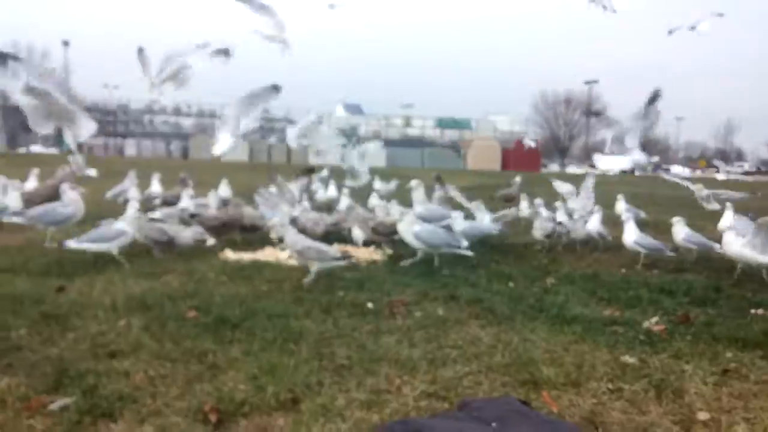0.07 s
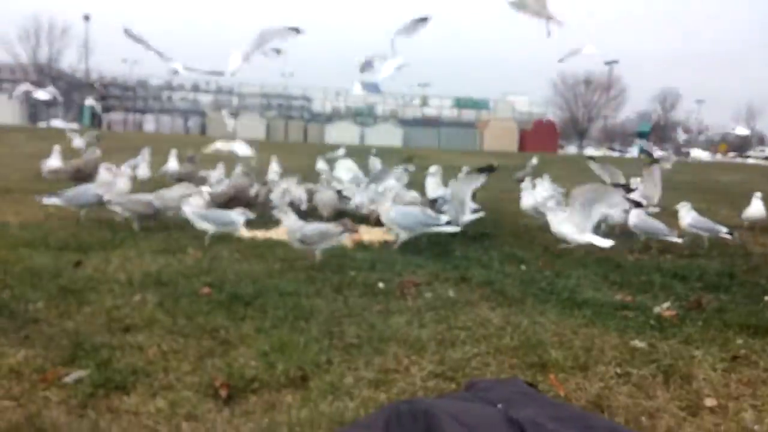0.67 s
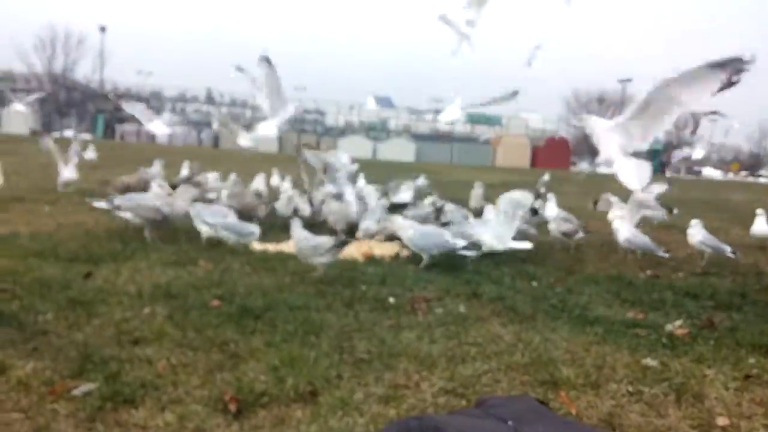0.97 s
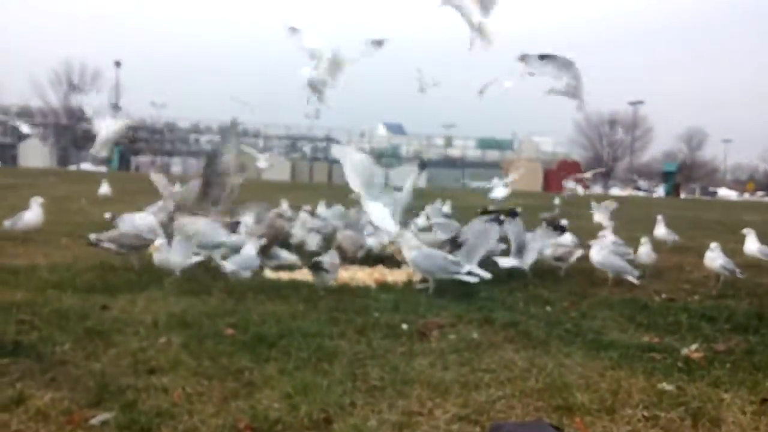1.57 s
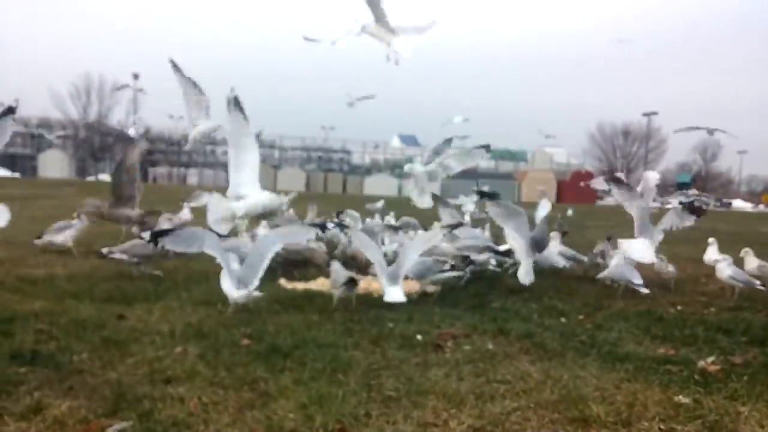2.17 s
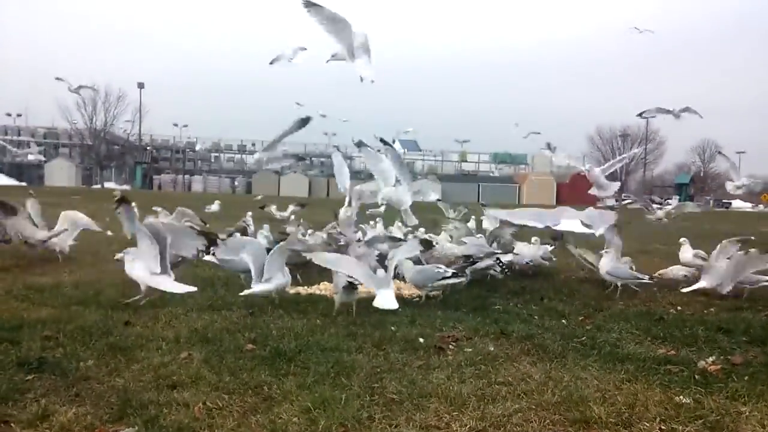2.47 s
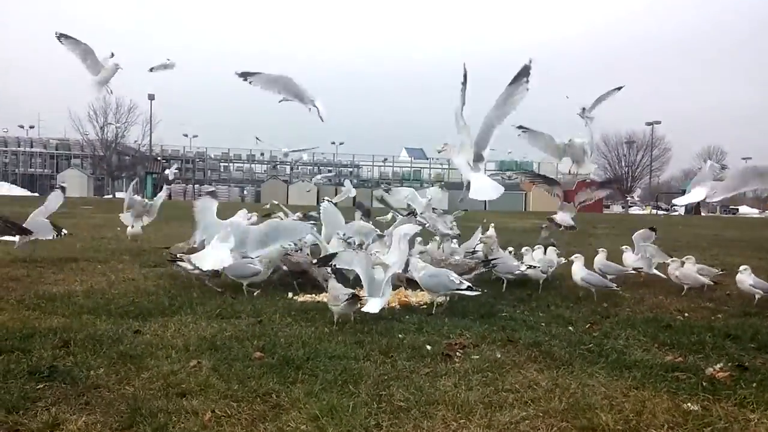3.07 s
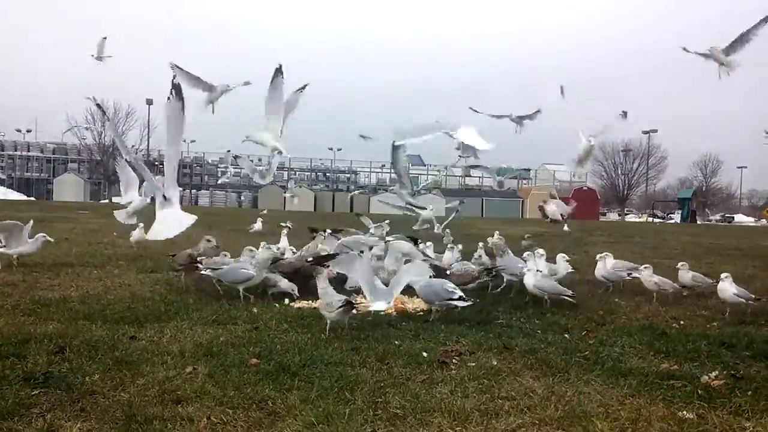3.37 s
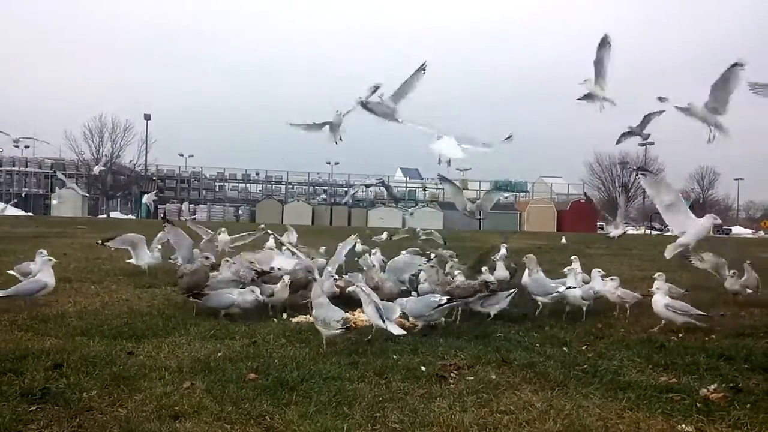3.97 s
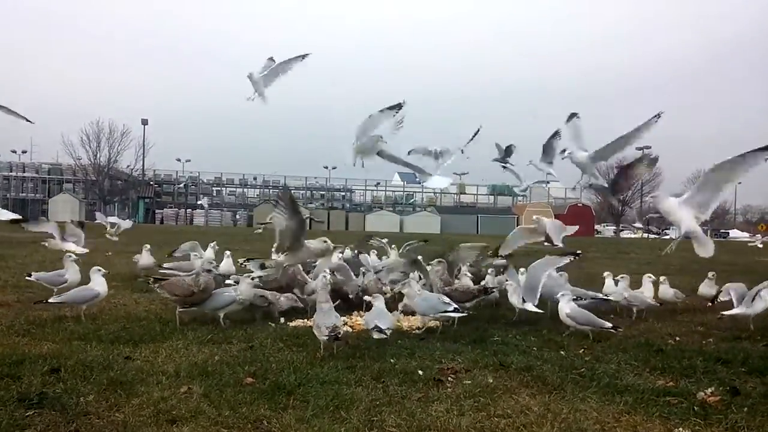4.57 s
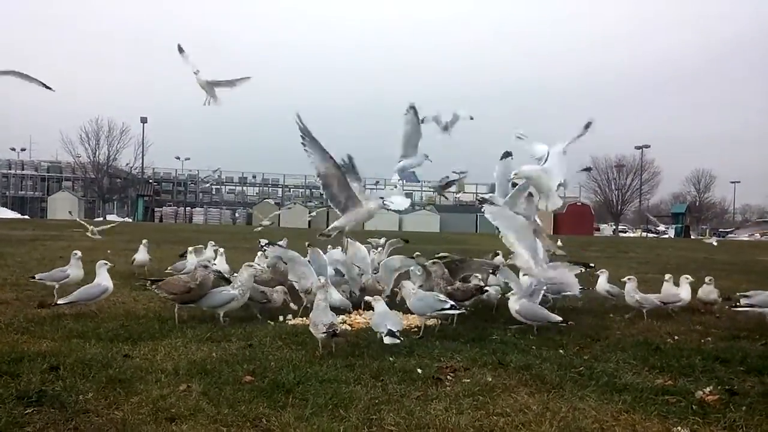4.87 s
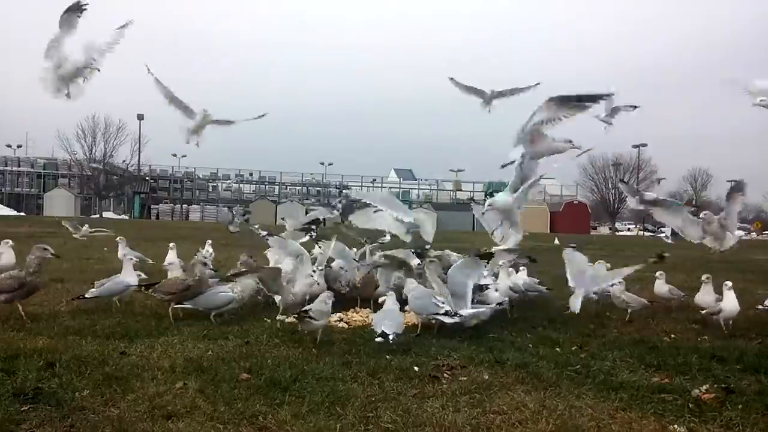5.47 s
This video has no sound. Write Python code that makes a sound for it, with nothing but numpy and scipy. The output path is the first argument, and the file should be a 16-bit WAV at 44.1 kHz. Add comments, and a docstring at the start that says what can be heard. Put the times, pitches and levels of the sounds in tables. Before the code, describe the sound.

A flock of gulls squeals and squawks over food on an open lawn, with fluttering wings and gusts rumbling on the microphone.

```python
"""Gulls squabble over food on an open lawn, a few metres from a hand-held phone.
After 0.6 s of silence the sound opens abruptly on fluttering wings. Young birds squeal in near-pure
whistles; from 1.1 s adults squawk in rough pulsed voices, shaped by the resonances of the throat.
From 2.3 s wings and bills clap now and then, as the flock behind grows loudest. Near 4 s the calls
thin out and gusts buffet the microphone ports; the squabble flares again as the wind dies away."""
import sys
import numpy as np
from scipy import signal
from scipy.fft import rfft, irfft, next_fast_len
from scipy.io import wavfile
from scipy.ndimage import map_coordinates

SR = 44100
rng = np.random.default_rng(int(sys.argv[2]) if len(sys.argv) > 2 else 0)


def wav_record(signal):
    """Record a signal, one row per channel, as 16-bit PCM in the file named by sys.argv[1]."""
    frames = np.transpose(np.atleast_2d(signal))
    bounded = np.clip(frames, -1, 1)
    # unit amplitude maps onto the largest positive 16-bit level
    quanta = np.round(bounded * 32767).astype(np.int16)
    wavfile.write(sys.argv[1], SR, quanta)


N = 252693
TIME = np.arange(N) / SR


def near_gulls(squeal_arch=3.2, squawk_arch=52, squeal_peak=0.27, squawk_peak=0.45, peak_shift=0.034):
    """Pitch follows effort: long or forced calls arch more; rising ones peak later, falling ones sooner."""
    # whistles of the young: (start [s], end [s], pitch [Hz], glide [semitones], level [dB],
    # overtone [dB], lead at the left port [ms])
    squeals = [(0.745, 0.799, 3390, 1.6, -34.5, -4.5, -0.47), (0.806, 1.005, 4630, -0.7, -26.5, -25, -.13),
               (0.793, 1.061, 4004, -0.9, -36.5, -51.5, -.13), (1.13, 1.325, 4790, 1, -40, -37, -0.046),
               (1.208, 1.315, 1147, -2, -42, 2.5, 0.017), (1.587, 1.739, 2368, 1.75, -21.5, -6.5, -0.52),
               (1.815, 1.857, 1845, -1.5, -32.5, -6, -0.067), (1.953, 2.011, 2955, -3, -25, -16.5, -0.11),
               (1.983, 2.052, 1651, -2, -25, 6, -0.065), (2.015, 2.142, 1784, 0.6, -23.5, -11.5, -0.049),
               (2.148, 2.194, 2284, 1.4, -34, -15, 0.065), (2.176, 2.245, 3410, -0.1, -22, -20.5, -0.48),
               (2.225, 2.327, 3604, 0.4, -20.5, -15.5, -0.53), (2.311, 2.494, 4550, -0.5, -22, -21, -0.5),
               (2.362, 2.486, 1806, 1.3, -28, -8, -0.054), (2.492, 2.556, 3300, -1, -19, -20, -.48),
               (2.545, 2.644, 2787, -1.4, -20.5, -18, -0.513), (2.661, 2.744, 2716, 1.3, -19, -37, -0.51),
               (2.699, 2.822, 4490, -1.5, -29, -35.5, -.46), (2.802, 2.95, 2940, -1, -35.5, -5.5, -.53),
               (2.816, 2.89, 1940, -0.4, -25, -15, -0.028), (2.971, 3.005, 2110, -3, -30, -2, 0.021),
               (3.559, 3.671, 4215, 0, -18, -12, -0.54), (3.673, 3.83, 4570, -0.5, -31.5, -19, -0.49),
               (3.655, 3.854, 4250, -0.7, -28, -19, -0.56), (3.825, 3.875, 3904, -2.5, -22.5, -17.5, -0.57),
               (4.686, 4.8, 1751, -0.4, -32, -11.5, 0), (4.842, 5.087, 6550, -2.5, -53.5, -26, .03),
               (4.927, 4.98, 1857, -5, -32.5, -19, -0.061), (4.949, 5.031, 2420, 1.7, -33.5, -20, -0.059),
               (5.038, 5.176, 3650, 0.4, -42, -20, 0.058), (5.177, 5.26, 2320, -1.9, -36, -25, 0.028),
               (5.217, 5.247, 3670, 2.5, -23, -11, 0.057), (5.273, 5.313, 2410, -2.5, -29, -25, .02),
               (5.379, 5.464, 2280, 5.5, -28.5, -14, 0.071)]
    # pulsed calls of adults: (start [s], end [s], pitch [Hz], glide [semitones], level [dB],
    # throat resonance [Hz], treble [dB], rasp [0-1], lead at the left port [ms])
    squawks = [(1.095, 1.213, 442, 1, -28, 2340, -21, 0.8, 0),
               (1.347, 1.474, 464, -0.4, -22, 2538, -27, 0.8, -0.042),
               (1.467, 1.538, 414, 1.5, -31, 2170, -12.5, 0.76, 0.1),
               (1.606, 1.679, 337, -0.5, -32.5, 2400, -5.5, 0.9, -0.5),
               (1.702, 1.804, 612.5, 0, -23.5, 2783, -14, .55, -.16),
               (1.751, 1.865, 457.6, 2, -28.5, 2590, -18.5, 0.9, -0.048),
               (1.994, 2.085, 468, 0.5, -23.5, 2650, -11.5, 0.89, -0.067),
               (2.015, 2.152, 598, 1, -26.5, 2380, -12, 0.6, -0.097),
               (2.085, 2.179, 447, -1, -24.5, 2720, -14, .8, 0.47),
               (2.348, 2.499, 609.4, 1, -22.5, 2350, -7.5, 0.5, -0.062),
               (2.469, 2.574, 441, -3.5, -19.5, 2480, -16.5, .75, -0.48),
               (2.54, 2.657, 559, 1.5, -25.5, 2740, -8, .45, -0.47),
               (2.643, 2.691, 422, 1.5, -24.5, 2980, -15, 0.6, 0.091),
               (2.724, 2.82, 421.4, 3.5, -22.5, 2293, -23.5, .5, 0.41),
               (2.813, 2.889, 379.3, -3.5, -23.5, 2360, -17.5, 0.66, -0.085),
               (2.878, 2.935, 329, 2, -25, 2460, -22, 0.8, 0.11),
               (2.936, 3.011, 388.7, -3.5, -25.5, 2430, -19, .8, 0.1),
               (3.028, 3.115, 382, -2.2, -31, 2270, -28, 0.89, 0.083),
               (3.162, 3.242, 401.5, 10, -22.5, 3000, -12, 0.5, -0.062),
               (3.222, 3.309, 930.4, -1.66, -19.5, 3200, -4.5, 0.41, 0.32),
               (3.303, 3.361, 383, -4.5, -26, 3650, -14.5, 0.5, -0.31),
               (3.425, 3.514, 347.4, -3, -30.5, 3400, -16, 0.7, -0.25),
               (3.462, 3.525, 370, 1.5, -39, 4450, -7, 0.5, -.235),
               (3.513, 3.607, 950, -2, -29, 2100, -10, .6, 0.543),
               (3.672, 3.777, 466.5, 0.9, -31, 3660, -8, 0.6, 0.086),
               (4.302, 4.416, 341.6, 2.5, -39, 2217, -22, 0.8, 0),
               (4.633, 4.71, 322, 3.5, -34, 2080, -34, 0.67, 0),
               (4.687, 4.802, 582.7, -1.5, -25, 2052, -22, .65, 0),
               (5.232, 5.311, 571, 0.5, -28, 4600, -5, 0.8, 0.074),
               (5.296, 5.408, 617.5, -1, -23.5, 3480, -1, 0.3, 0.57),
               (5.395, 5.479, 416, -1, -25, 4350, -8.5, 0.8, .089),
               (5.408, 5.46, 605, -2, -27, 3570, -16, .4, 0.085),
               (5.458, 5.522, 605, 0, -27, 3650, -15, 0.6, 0.063),
               (5.461, 5.552, 471, -1.5, -23.5, 2290, -5, 0.8, 0.48),
               (5.516, 5.576, 598, 0.5, -25, 3630, -6.5, .4, -0.048),
               (5.565, 5.646, 590, -1.5, -25.5, 3680, -5, 0.4, -0.061),
               (5.647, 5.722, 903, -1.5, -30, 2050, -12.5, 0.9, -0.035)]
    out = np.zeros((2, N))
    for start, end, pitch_hz, glide, db, overtone_db, lead_ms in squeals:
        length = end - start
        pitches = contour(pitch_hz, glide, squeal_arch * length)
        call = squeal(length, pitches, squeal_peak + peak_shift * glide, overtone_db)
        add(out, start, undb(db) * call, lead_ms=lead_ms)
    for start, end, pitch_hz, glide, db, throat_hz, treble_db, rasp, lead_ms in squawks:
        length = end - start
        pitches = contour(pitch_hz, glide, squawk_arch * length * rasp ** 2)
        call = squawk(length, pitches, squawk_peak + peak_shift * glide, throat_hz, treble_db, rasp)
        add(out, start, undb(db) * call, lead_ms=lead_ms)
    return out


def squeal(length, pitches, peak, overtone_db, waver=0.0037, shimmer=0.18, third_db=-17,
           hiss_db=-25, buzz_db=-15, buzz_hz=440, flutter_db=2):
    """Self-sustained oscillation: a tight syrinx whistles; its other side adds a modulating buzz."""
    hz, swell = gesture(length, pitches, peak, edge_s=0.0058, taper=1.0)
    n = len(hz)
    hz = hz * (1 + waver * walk(n, 32.8) + 0.009 * walk(n, 244))
    swell = swell * undb(flutter_db * walk(n, 26.7))
    phase = 2 * np.pi * np.cumsum(hz) / SR
    partials_db = [0, overtone_db, overtone_db + third_db]
    tone = sum(undb(db) * np.sin(k * phase) for k, db in enumerate(partials_db, 1))
    buzz_phase = 2 * np.pi * np.cumsum(buzz_hz * (1 + 0.15 * walk(n, 44))) / SR
    buzz = undb(buzz_db) * np.sin(buzz_phase)
    hiss = undb(hiss_db) * walk(n, 460) * np.cos(phase)  # narrow noise band around the pitch
    return np.sqrt(2) * swell * (tone * (1 + shimmer * walk(n, 81.3) + buzz) + hiss)


def squawk(length, pitches, peak, throat_hz, treble_db, rasp, shimmer=0.57, doubling=0.39,
           lock_db=3, sag=0.0562, follow=0.49):
    """Source and filter: the syrinx slaps once a cycle, unevenly if forced, and the throat rings."""
    hz, swell = gesture(length, pitches, peak, edge_s=0.014, taper=2.27)
    hz = hz * (1 - sag * np.exp(-3 * swell))  # the pitch sags where the air pressure is low
    n, rough = len(hz), np.clip(rasp, 0, 1) ** 2
    jitter = .009 * rough * walk(n, 110) + .006 * walk(n, 30)
    phase = 2 * np.pi * np.cumsum(hz * (1 + jitter)) / SR
    pulses = unit(sum(np.cos(k * phase) for k in range(1, int(12000 / hz.max()) + 1)))
    # period doubling: slaps alternate strong and weak, each with a puff of noise
    pulses = pulses * (1 + rough * (shimmer * walk(n, 145.7) + doubling * np.cos(phase / 2)))
    puffs = .35 * rough * unit((1 + np.cos(phase)) * rng.standard_normal(n))
    # the throat's clock speeds up with the pitch, so its resonances glide with the call
    clock = np.cumsum((hz / hz[n // 2]) ** follow)
    ticks = np.interp(np.arange(int(clock[-1]) + 2), clock, np.arange(n))
    source = map_coordinates(pulses + puffs, [ticks])
    voice = map_coordinates(throat(windpipe(source), throat_hz, treble_db), [clock])
    # the bill opens with the push of air, so the call is brightest in its swell
    closed = shape(voice, lambda f: 1 / (1 + (f / throat_hz) ** 6))
    voice = closed + (swell / swell.max()) ** 2 * (voice - closed)
    # the harmonic nearest the throat resonance locks on and sings out, most in a clear voice
    harmonic = np.round(throat_hz / pitches[1])
    locked = np.sqrt(2) * np.sin(harmonic * phase) * (1 + rough * walk(n, 116))
    return swell * unit(voice + undb(lock_db) * max(1 - rasp, 0) * locked)


def throat(source, throat_hz, treble_db, width=0.33, widen=0.005, pipe_hz=1780, pipe_db=-16,
           skirt_db=-30, bill_hz=5300, bill_width=0.18, top_db=-9):
    """Formants: the throat resonates above the windpipe; an open bill widens the peak and adds treble."""
    width = max(width + widen * treble_db, .1)

    def formants(f):
        peaks = bell(f, throat_hz, width) + undb(pipe_db) * bell(f, pipe_hz, 0.046)
        return peaks / (1 + (1500 / f) ** 16) + undb(skirt_db) * bell(f, 824, 0.14)
    body = shape(source, formants)
    top_gain = undb(top_db + treble_db / 2)
    treble = shape(source, lambda f: bell(f, bill_hz, bill_width) + top_gain * bell(f, 8220, 0.15))
    return unit(unit(body) + undb(treble_db + 0.5) * unit(treble))


def windpipe(source):
    """All-pass dispersion: echoes in the windpipe smear each slap over the cycle that follows."""
    round_trips_s = rng.uniform([[.0003], [.0007]], [[.0006], [.0012]])

    def echoes(f):
        delays = np.exp(-2j * np.pi * f * round_trips_s)
        return np.prod((.5 + delays) / (1 + .5 * delays), axis=0)
    return shape(source, echoes)


def contour(pitch_hz, glide, arch):
    """Intonation: start, middle and end pitch of a glide with drooping ends (glide, arch in semitones)."""
    return pitch_hz * 2 ** (np.array([-glide / 2 - arch, 0, glide / 2 - arch]) / 12)


def gesture(length, pitches, peak, edge_s, taper):
    """Breath pressure: one push bends the pitch and swells the level to a peak at 0-1 of the length."""
    progress = np.linspace(0, 1, int(max(length, .02) * SR))
    hz = np.polyval(np.polyfit([0, .5, 1], pitches, 2), progress)
    from_edge_s = np.minimum(progress, 1 - progress) * length
    edges = np.sin(np.pi / 2 * np.clip(from_edge_s / edge_s, 0, 1))
    return hz, unit(edges * np.exp(-taper * (progress - peak) ** 2))


def claps(dull_hz=7000):
    """Impact excitation: a wing or bill strikes, giving a broad band of noise that decays at once."""
    # strikes: (time [s], peak level [dB], band centre [Hz], time to decay by 60 dB [s])
    strikes = [(2.255, -31, 265, 0.18), (2.415, -29, 220, 0.052), (2.545, -13.5, 1770, 0.022),
               (2.945, -33, 8000, 0.009), (3.419, -30, 890, 0.46), (3.627, -25, 690, 0.019),
               (4.036, -34, 580, 0.096), (4.244, -35, 700, 0.067), (4.335, -23.5, 1670, 0.091),
               (4.467, -35.5, 2480, 0.069), (4.934, -29, 2580, 0.036), (5.418, -27, 1010, 0.033)]
    out, t = np.zeros((2, N)), TIME[:SR // 10]
    for start, db, centre_hz, t60 in strikes:
        def band(f):
            return 1 / (1 + 1j * (f / centre_hz - centre_hz / f)) / (1 + 1j * f / dull_hz) ** 2
        burst = rng.standard_normal(len(t)) * undb(-60 * t / t60)
        crack = shape(burst, band)
        add(out, start, undb(db) * crack / np.abs(crack).max())
    return out


def far_gulls(count=44):
    """Superposition: short bending squawks from the rest of the flock add up to a crowd."""
    # loudness of the distant flock: (time [s], level [dB])
    crowd_levels = [(.6, -40.5), (1.2, -47.5), (1.55, -34.5), (1.9, -44), (2.6, -27.5), (3.4, -39),
                    (4.1, -65), (4.6, -52), (5.7, -34)]
    out = np.zeros((2, N))
    for k, (when, length, pitch, throat_size, side, bend) in enumerate(rng.random((count, 6))):
        pitches = (300 + 480 * pitch ** 2) * np.array([.7 + .2 * bend, 1, .76])
        throat_hz = 1800 + 1100 * throat_size
        call = squawk(.11 + .14 * length, pitches, .5, throat_hz, treble_db=-11, rasp=.55)
        start = (k + when / 2) / count * N / SR
        add(out, start, call, pan_db=8 * (side - .5), lead_ms=0.59 * (side - .5))
    return unit(out) * undb(curves(crowd_levels)[0])


def wings(count=130, scatter_db=4, murmur=0.48, apart=0.32):
    """Aerodynamic noise: wingbeats, each a whoosh of feathers and a thud of air, merge into a flutter."""
    # loudness of the flutter: (time [s], level [dB])
    flutter_levels = [(.6, -33), (1.5, -34), (1.85, -43), (2.2, -41.5), (3.65, -39), (4.2, -44),
                      (5.73, -38)]
    # its spectrum: (frequency [Hz], gain [dB])
    flutter_spectrum = [(25, -45), (50, 2.5), (90, 5.5), (220, 0), (450, -7.5), (750, -13), (1400, -17),
                        (2500, -19.5), (5000, -30.5), (9000, -30), (15000, -42)]
    beats = np.zeros((2, N))
    for k, (when, length, size, side) in enumerate(rng.random((count, 4))):
        n = int((0.048 + 0.13 * length) * SR)
        whoosh = np.hanning(n) ** 2 * rng.standard_normal(n) * undb(2 * walk(n, 79.5))
        start = (k + when) / count * N / SR
        add(beats, start, whoosh * undb(scatter_db * size), 6 * (side - .5), 0.53 * (side - .5))
    blur = murmur * rng.standard_normal(N) + apart * rng.standard_normal((2, N))
    return unit(colour(unit(beats) + blur, flutter_spectrum)) * undb(curves(flutter_levels)[0])


def wind(flicker_db=2, eddy_half_s=0.03, eddy_pan_db=-13.5):
    """Turbulence: each port rumbles with its own noise; a windy spell and short eddies add in power."""
    # wind crossing from the left port to the right: (time [s], level [dB], left minus right [dB])
    spell = [(3.5, -66, -11), (3.9, -33.5, 18.5), (4.15, -33, -2), (4.35, -28.5, 5), (4.6, -31.5, -3),
             (4.8, -27.5, -14), (5.3, -33.5, -2), (5.55, -48, -11)]
    # eddies that slap the ports: (time [s], level [dB])
    eddies = [(4.009, -22), (4.464, -20.5), (4.55, -29), (4.855, -22.5), (4.981, -24.5), (5.082, -32.5)]
    # spectrum of the rumble: (frequency [Hz], gain [dB])
    rumble_spectrum = [(20, -32.5), (35, -36), (60, -1), (110, 1), (270, -12.5), (500, -27.5),
                       (1200, -57.5), (3000, -71)]
    sides = np.array([[.5], [-.5]])
    level_db, pan_db = curves(spell)
    power = undb(level_db + sides * pan_db) ** 2
    for centre_s, db in eddies:
        swell = np.exp(-.5 * ((TIME - centre_s) / eddy_half_s) ** 2)
        power = power + (undb(db + sides * eddy_pan_db) * swell) ** 2
    ports = np.array([rng.standard_normal(N) * undb(flicker_db * walk(N, 26)) for _ in range(2)])
    return unit(colour(ports, rumble_spectrum)) * np.sqrt(power)


def field(x, echo_db=-21, t60=0.19, dull_hz=4500):
    """Scattering: ground, sheds and trees return a thin, dull tail."""
    t = TIME[:SR // 2]
    tail = rng.standard_normal((2, len(t))) * undb(-60 * t / t60)
    tail = shape(tail, lambda f: 1 / (1 + 1j * f / dull_hz))
    tail = tail / np.sqrt(np.sum(tail ** 2, axis=1, keepdims=True))
    return x + undb(echo_db) * signal.fftconvolve(x, tail, axes=1)[:, :N]


def phone_body(x):
    """Acoustic shadow: the case shades each port differently, so a call leans aside with its pitch."""
    # imbalance of the ports: (frequency [Hz], left minus right [dB])
    imbalance = [(1200, -2.5), (1800, -4), (2400, -5.5), (3000, -3.5), (3600, 8.5), (4200, 7.5),
                 (4900, 6.5), (6200, 6), (7300, -3), (8700, -10.5), (11000, -1)]
    # colour that the case gives both ports: (frequency [Hz], gain [dB])
    case_response = [(1000, 2), (1700, -1), (2600, 1), (4200, 1.5), (6500, -1.5), (8500, 3), (10500, -2.5),
                     (12600, -7), (14200, 2.5)]
    hz, lean_db = np.transpose(imbalance)
    shares = [2 / (1 + undb(-side * lean_db) ** 2) for side in (1, -1)]
    ports = np.array([colour(port, np.c_[hz, 10 * np.log10(share)]) for port, share in zip(x, shares)])
    return colour(ports, case_response)


def add(out, start, sound, pan_db=0, lead_ms=0):
    """Level and time differences place a sound: positive values make the left port louder and earlier."""
    i = int(start * SR)
    for channel, side in enumerate((.5, -.5)):
        shifted = shape(sound, lambda f: np.exp(2j * np.pi * f * side * lead_ms / 1000))
        out[channel, i:i + len(shifted)] += undb(side * pan_db) * shifted[:max(N - i, 0)]


def shape(x, gain):
    """Linear filtering: multiply the spectrum by gain(frequency)."""
    size = next_fast_len(x.shape[-1] + 1024)
    hz = np.arange(size // 2 + 1) * SR / size + 1e-3
    return irfft(rfft(x, size) * gain(hz), size)[..., :x.shape[-1]]


def colour(x, points):
    """Equalisation through points of (frequency [Hz], gain [dB])."""
    hz, db = np.transpose(points)
    return shape(x, lambda f: undb(np.interp(np.log(f), np.log(hz), db)))


def bell(f, hz, width):
    """Resonance: a Gaussian hump on a log-frequency axis."""
    return np.exp(-.5 * (np.log(f / hz) / width) ** 2)


def walk(size, rate):
    """Band-limited noise of spread near 1 that changes about rate times a second."""
    knots = rng.standard_normal(int(2 * rate * size / SR) + 4)
    return map_coordinates(knots, [1 + np.arange(size) * 2 * rate / SR], order=3, mode="nearest")


def curves(rows):
    """Linear interpolation of a table's columns over time."""
    times, *columns = np.transpose(rows)
    return [np.interp(TIME, times, column) for column in columns]


def undb(db):
    """Decibels to amplitude ratio."""
    return 10 ** (np.asarray(db) / 20)


def unit(x):
    """Normalisation to rms 1."""
    return x / np.sqrt(np.mean(x ** 2) + 1e-18)


def scene():
    """Superposition: calls and claps, scattered and shaded, add to the flutter and the wind."""
    return phone_body(field(near_gulls() + far_gulls() + claps())) + wings() + wind()


def record(dry, start_s=.606, rise_s=.004, top_hz=15700):
    """Gating and band limiting: the phone opens its input abruptly and cuts the top."""
    opened = np.clip((TIME - start_s) / rise_s, 0, 1)
    lowpass = signal.ellip(10, .2, 90, top_hz, fs=SR, output="sos")
    return signal.sosfilt(lowpass, dry * opened)


dry = scene()
out = record(dry)
wav_record(out)
```